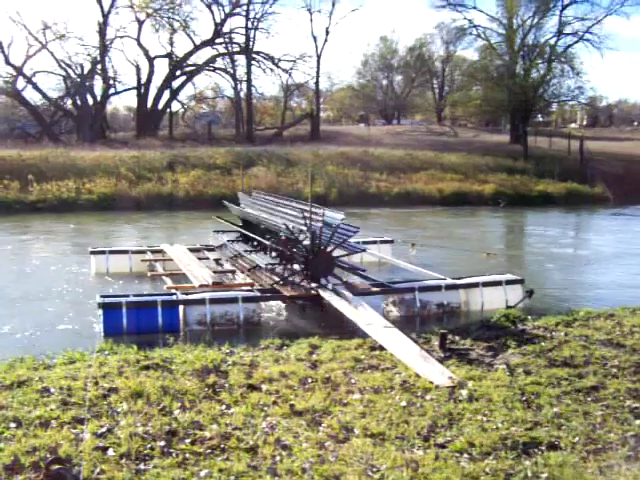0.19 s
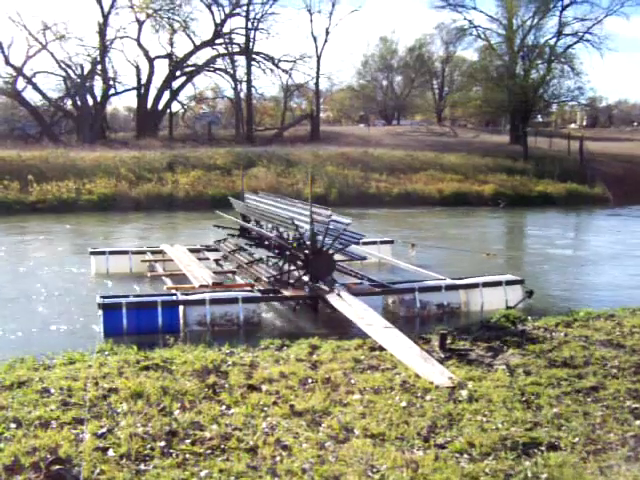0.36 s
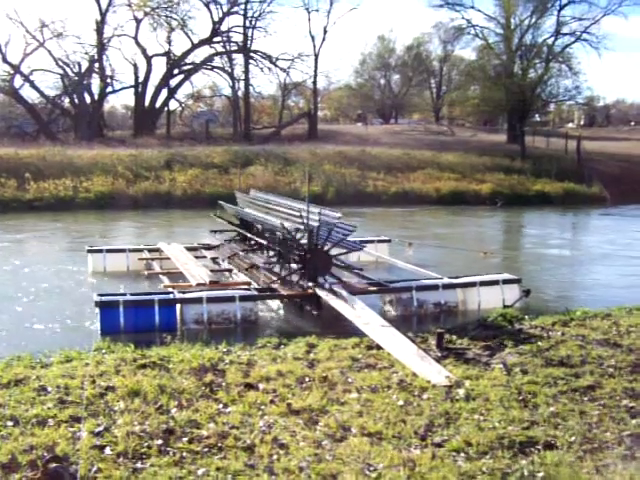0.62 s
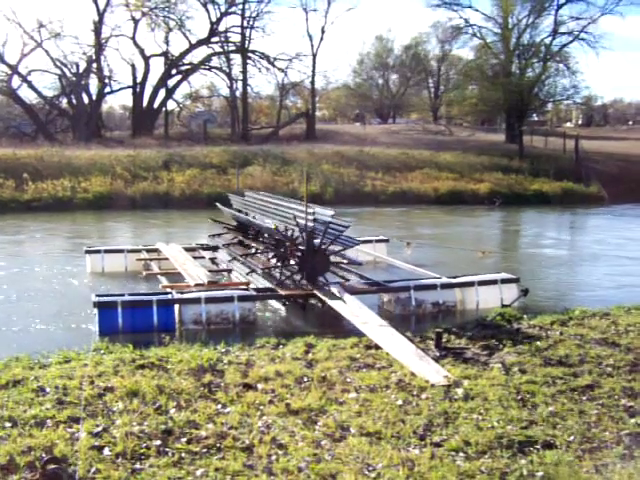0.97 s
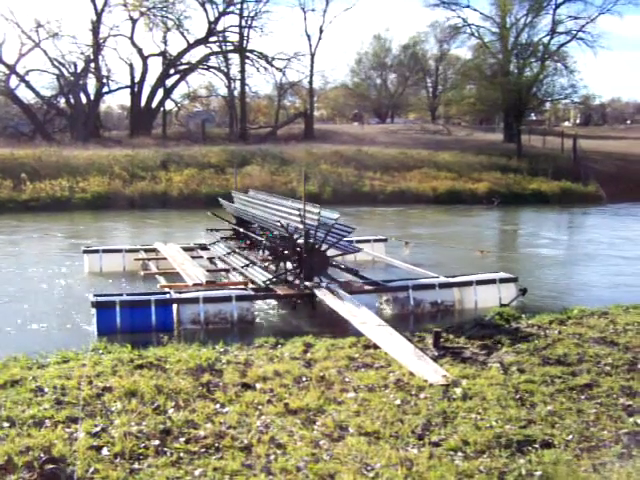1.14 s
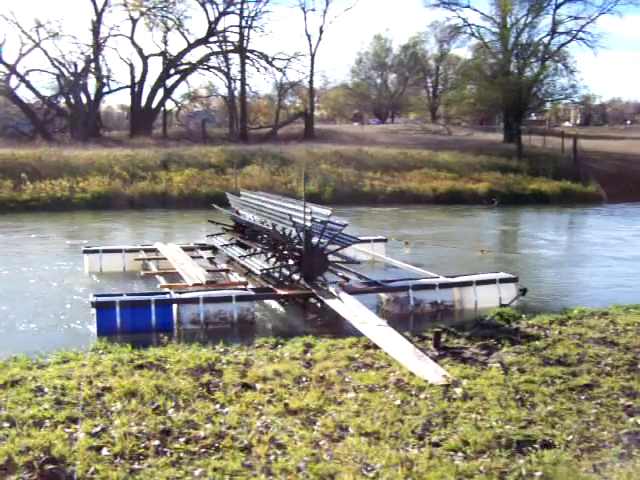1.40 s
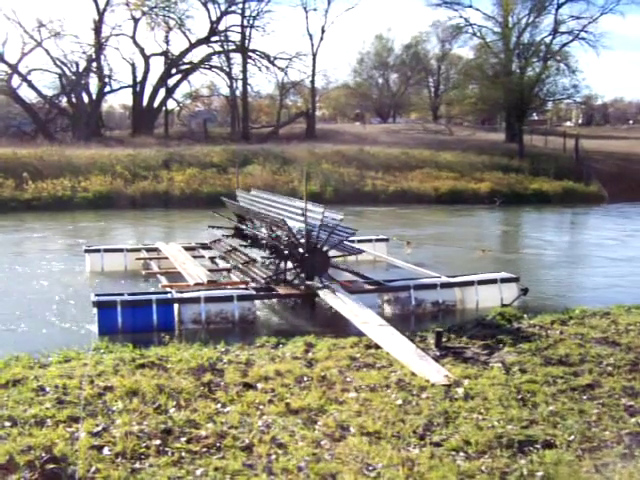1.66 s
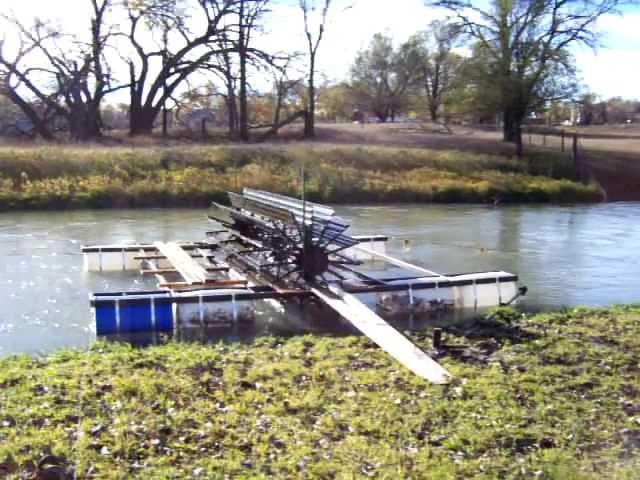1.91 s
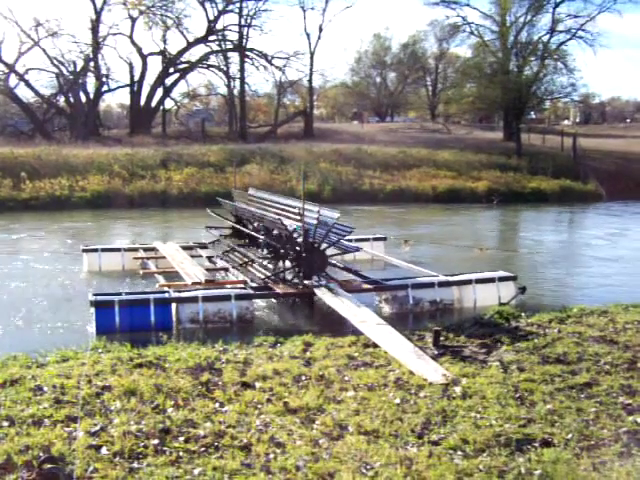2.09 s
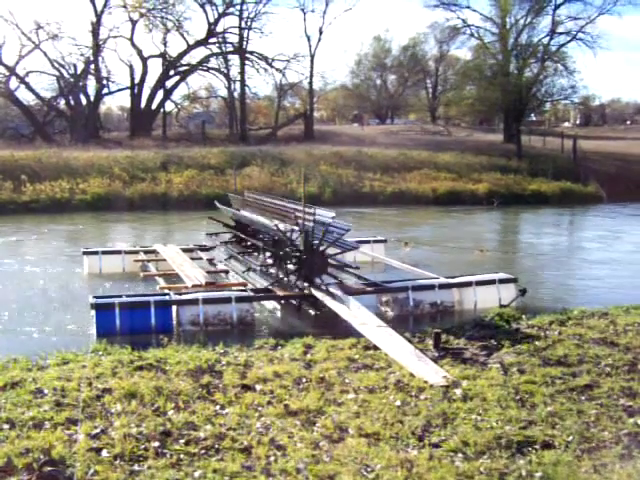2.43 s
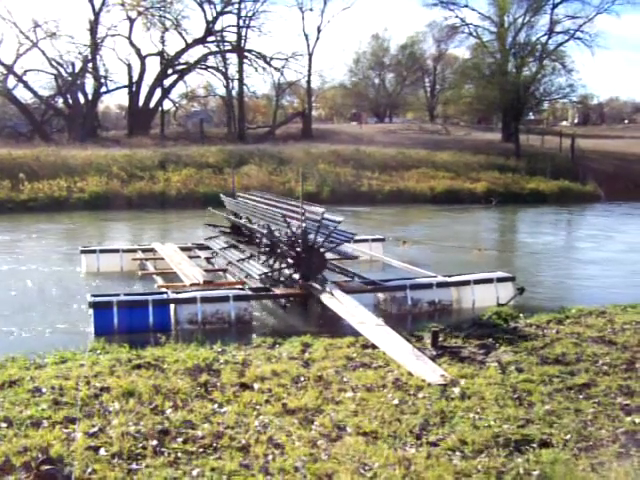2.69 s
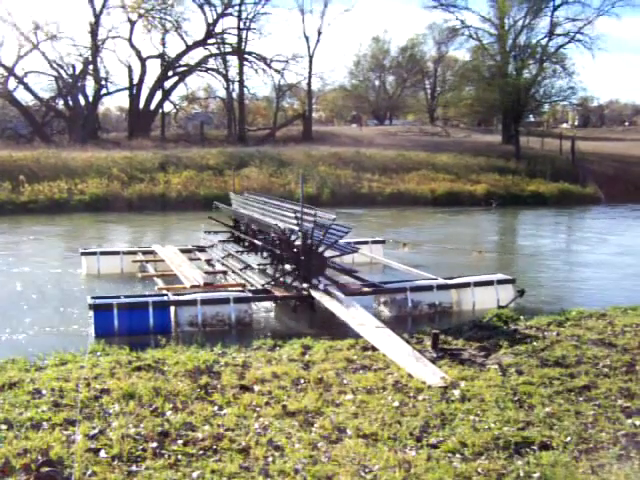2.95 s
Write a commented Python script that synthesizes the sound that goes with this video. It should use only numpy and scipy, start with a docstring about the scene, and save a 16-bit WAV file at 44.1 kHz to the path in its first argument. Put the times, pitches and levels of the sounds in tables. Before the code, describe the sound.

A paddle wheel splashes continuously in a river, its blades dipping with uneven sloshes, glugs and pattering drops. Behind it the current flows evenly, and soft gusts buffet the microphone on the open bank.

```python
"""Water churns and spray patters in surges at a floating paddle wheel, heard from the river bank.
The current rushes behind it; light wind rumbles on the microphone.
Paddles plunge with a hollow gulp and a slosh, among drips, glugs of freed air and a few slaps.
Churn, spray and plunges are clouds of ringing bubbles plus noise; drips and glugs ring single bubbles.
Current, wind and slaps are shaped noise."""
import sys
import numpy as np
from scipy.fft import rfft, irfft, next_fast_len
from scipy.io import wavfile
from scipy.ndimage import map_coordinates

SR = 44100
rng = np.random.default_rng(int(sys.argv[2]) if len(sys.argv) > 2 else 0)


def materialize(psi):
    """Save the field psi as 16-bit PCM at rate SR to the path in sys.argv[1].

    A 1-D psi becomes a single channel; in a 2-D psi each row is a channel.
    """
    bounded = np.clip(np.atleast_2d(psi).T, -1, 1)
    quanta = np.round(bounded * 32767).astype(np.int16)
    wavfile.write(sys.argv[1], SR, quanta)


N = 134946
T = np.arange(N) / SR

# splashing at the wheel (time [s], level [dB])
SPLASH_LEVELS = [(0.0, -27.5), (0.06, -30.5), (0.12, -29), (0.26, -27), (0.3, -27.5), (0.46, -27),
                 (0.5, -30.5), (0.56, -31), (0.7, -28.5), (0.78, -28), (0.84, -25.5), (0.94, -28.5),
                 (1.06, -29.5), (1.1, -30), (1.16, -27), (1.26, -27.5), (1.34, -30.5), (1.37, -28.5),
                 (1.4, -31.5), (1.46, -32), (1.64, -29.5), (1.7, -33.5), (1.77, -31), (1.83, -31.5),
                 (1.89, -32.5), (2.02, -30), (2.09, -26.5), (2.16, -29.5), (2.28, -27.5), (2.32, -33),
                 (2.36, -30.5), (2.46, -30.5), (2.58, -28), (2.66, -28.5), (2.72, -29), (2.78, -27.5),
                 (2.86, -31.5), (2.9, -27), (2.98, -32), (3.05, -29.5)]
# wind on the microphone (time [s], level [dB])
WIND_LEVELS = [(0.0, -45), (0.06, -38), (0.21, -39.5), (0.25, -32.5), (0.29, -30.5), (0.41, -47.5),
               (0.45, -34.5), (0.5, -38.5), (0.84, -36), (0.92, -40.5), (1.06, -40), (1.16, -41),
               (1.24, -38), (1.28, -40.5), (1.35, -36), (1.43, -33), (1.6, -40), (1.72, -32), (1.77, -35.5),
               (1.82, -30), (1.88, -36.5), (1.92, -30.5), (1.99, -33.5), (2.04, -32.5), (2.16, -42),
               (2.25, -33), (2.29, -40.5), (2.47, -33), (2.56, -47), (2.62, -38), (2.67, -40.5),
               (2.79, -29), (2.84, -36.5), (2.98, -27.5), (3.05, -36)]
# near drips (time [s], level [dB], pitch [Hz], t60 [s])
DRIP_EVENTS = [(0.1285, -11, 3720, 0.0044), (0.2704, -12.5, 3140, 0.0055), (0.3747, -20, 2470, 0.016),
               (0.4337, -16.5, 3230, 0.0088), (0.4338, -9.5, 3480, 0.005), (0.4575, -16.5, 4600, 0.0064),
               (0.534, -13, 4400, 0.005), (0.5815, -8, 3800, 0.0052), (0.941, -14, 2970, 0.0059),
               (1.0147, -15, 3300, 0.0055), (1.2168, -12, 3120, 0.0034), (1.3547, -12, 4300, 0.0018),
               (1.3597, -13.5, 3500, 0.0054), (2.0141, -15, 6020, 0.015), (2.2669, -24, 3760, 0.0043),
               (2.6383, -15, 3440, 0.0037), (2.9672, -18.5, 3520, 0.012), (3.0102, -14.5, 5330, 0.0026)]
# paddle plunges (time [s], gulp level [dB], slosh level [dB])
PLUNGE_EVENTS = [(0.144, -31, -27), (.305, -45, -41), (.44, -39, -36.5), (.625, -30.5, -44),
                 (.8, -35, -32.5), (1.09, -31, -31), (1.84, -33, -46), (2.005, -27, -40),
                 (2.28, -31, -35.5), (2.74, -33.5, -57), (2.91, -46, -33.5)]
# large air pockets breaking loose (time [s], level [dB], start pitch [Hz])
GLUG_EVENTS = [(.15, -21, 315), (0.162, -18.5, 475), (0.191, -17.5, 1455), (.21, -25.5, 529),
               (0.463, -19.5, 1320), (1.098, -24, 458), (1.555, -20, 951), (1.835, -24.5, 2050),
               (2.021, -24, 476)]
# water slapping the paddles (time [s], level [dB])
SLAP_EVENTS = [(.4348, -21), (.485, -23), (.5335, -18), (0.568, -16), (0.576, -20), (.643, -18),
               (1.3533, -12), (1.358, -23), (1.3595, -28), (1.3664, -23), (1.634, -23), (1.797, -30),
               (1.93, -15.5), (2.801, -16.5), (3.0095, -10.5)]

# source spectra (frequency [Hz], relative density [dB])
CHURN_SPECTRUM = [(100, -4), (200, 2.5), (320, -5), (400, -4.5), (490, -0.5), (600, -3.5), (710, -12),
                  (950, -0.5), (1400, -1), (1750, -2), (2500, 1), (4000, -4), (6000, 1), (10000, -55.5)]
SPRAY_SPECTRUM = [(700, -48), (1500, -16), (2700, -5.5), (3500, 1.5), (4400, -1), (5000, -4.5), (5700, -7),
                  (6500, -16.5), (7200, -17.5), (8000, -26.5), (8800, -27), (10000, -43.5)]
CURRENT_SPECTRUM = [(59, -23.5), (100, -13), (247, -5), (524, 1), (674, -7.5), (972, -1.5), (1630, -6.5),
                    (3670, -6), (5830, -18), (10000, -66), (13000, -75), (22000, -120)]
RUMBLE_SPECTRUM = [(15, -27), (25, -5), (40, -5), (65, 0.5), (115, -5.5), (190, -12), (300, -23.5),
                   (700, -67)]
BUFFET_SPECTRUM = [(30, -36), (65, -10.5), (110, 2), (180, -6), (260, -10.5), (600, -55.5)]
GULP_SPECTRUM = [(80, -26.5), (180, -5.5), (330, 6), (490, 5.5), (600, 5), (720, -21), (1500, -30)]
SLOSH_SPECTRUM = [(600, -29), (950, -5.5), (1450, -1), (2200, -1.5), (4000, -19.5), (8000, -41)]
SLAP_SPECTRUM = [(800, -29), (2200, -12), (3400, 7.5), (4500, 1.5), (5800, 0.5), (6800, -18.5), (8500, -21),
                 (10000, -45)]

IMPACT_RISE_S = 0.0003


def amp(db):
    """Decibels to gain."""
    return 10 ** (np.asarray(db) / 20)


def unit(x):
    """x at rms 1."""
    return x / np.sqrt(np.mean(x ** 2) + 1e-20)


def curve(rows):
    """One value per sample from (time [s], value) rows."""
    return np.interp(T, *np.transpose(rows))


def wobble(rate_hz):
    """Smooth random curve through Gaussian knots at rate_hz."""
    return map_coordinates(rng.standard_normal(2048), [T * rate_hz], mode="wrap")


def filtered(x, response):
    """Zero-phase filter with gain response(hz)."""
    size = next_fast_len(N + SR // 2)
    return irfft(rfft(x, size) * response(np.fft.rfftfreq(size, 1 / SR)), size)[:N]


def low_pass(x, cutoff_hz, order):
    """Butterworth magnitude, zero phase."""
    return filtered(x, lambda hz: 1 / np.sqrt(1 + (hz / cutoff_hz) ** (2 * order)))


def coloured(x, spectrum):
    """x shaped by a spectrum table, at rms 1."""
    knots_hz, db = np.transpose(spectrum)
    return unit(filtered(x, lambda hz: amp(np.interp(np.log(hz + 1), np.log(knots_hz), db))))


def noise(spectrum):
    """Shaped Gaussian noise at rms 1."""
    return coloured(rng.standard_normal(N), spectrum)


def swell(t, rise_s, t60_s):
    """Soft attack, exponential decay; silent before t = 0."""
    t = np.maximum(t, 0)
    return (1 - np.exp(-t / rise_s)) * np.exp(-np.log(1000) * t / t60_s)


def bubbles(spectrum, count, lo_hz, hi_hz, t60_cycles, glide, wash):
    """Cloud of short rising rings, many weak, few strong; wash is the noise share before shaping."""
    onset, pitch, rank, life = rng.random((count, 4)).T[:, :, None]
    hz = lo_hz * (hi_hz / lo_hz) ** pitch
    t60_s = t60_cycles * (.5 + life) / hz
    offsets = np.arange(min(int(t60_s.max() * SR), SR // 20))
    t = offsets / SR
    gain = np.maximum(rank, .02) ** -.3 * np.sqrt(hz / hi_hz)
    rings = gain * swell(t, .5 / hz, t60_s) * np.sin(2 * np.pi * hz * t * (1 + glide * t / t60_s))
    positions = (onset * N).astype(int) + offsets
    cloud = np.bincount(positions.ravel(), rings.ravel(), N)[:N]
    rush = low_pass(rng.standard_normal(N), hi_hz, order=1)
    return coloured(np.sqrt(1 - wash) * unit(cloud) + np.sqrt(wash) * unit(rush), spectrum)


def splashing():
    """One surging flow drives big churn bubbles, fine spray and a light patter of drops."""
    level_db = curve(SPLASH_LEVELS)
    surge_db = level_db - level_db.mean() + .5 * wobble(34.75)
    churn = bubbles(CHURN_SPECTRUM, 1500, lo_hz=278.8, hi_hz=3104, t60_cycles=87, glide=.057, wash=.62)
    spray = bubbles(SPRAY_SPECTRUM, 7000, lo_hz=1515, hi_hz=8520, t60_cycles=29, glide=.058, wash=.79)
    patter = bubbles(SPRAY_SPECTRUM, 350, lo_hz=1976, hi_hz=8230, t60_cycles=26, glide=.023, wash=.01)
    churn *= amp(-5 + .93 * surge_db + 1.35 * wobble(20))
    spray *= amp(-2 + 1.51 * surge_db + 1.45 * wobble(50.61))
    patter *= amp(-10.5 + .9 * surge_db)
    return amp(level_db.mean()) * (churn + spray + patter)


def current(level_db=-36.5):
    """Even rush of the river."""
    return amp(level_db + .36 * wobble(7.62)) * noise(CURRENT_SPECTRUM)


def wind():
    """Gusts rumble on the microphone; stronger ones add higher buffeting."""
    level_db = curve(WIND_LEVELS)
    gust_db = level_db - level_db.mean() + wobble(24.98)
    rumble = amp(.79 * gust_db) * noise(RUMBLE_SPECTRUM)
    buffet = amp(-8.5 + 2.3 * gust_db) * noise(BUFFET_SPECTRUM)
    return amp(level_db.mean()) * (rumble + buffet)


def drips(scatter_db=-10):
    """A near drop rings a tiny bubble and scatters a little spray."""
    out = np.zeros(N)
    fizz = noise(SPRAY_SPECTRUM)
    t = np.arange(SR // 25) / SR
    for start_s, db, hz, t60_s in DRIP_EVENTS:
        start = round(start_s * SR)
        span = slice(start, start + len(t))
        envelope = swell(t, IMPACT_RISE_S, t60_s)
        ring = np.sin(2 * np.pi * hz * t) * envelope / envelope.max()
        scatter = amp(scatter_db) * fizz[span] * swell(t, IMPACT_RISE_S, t60_s=.037)
        out[span] += amp(db) * (ring + scatter)
    return low_pass(out, cutoff_hz=5800, order=5)


def paddles(rise_s=.011, slosh_lag_s=.024):
    """Each paddle traps air with a low gulp, then throws a brighter slosh."""
    gulp = bubbles(GULP_SPECTRUM, 500, lo_hz=162.5, hi_hz=660, t60_cycles=15.8, glide=.21, wash=.49)
    slosh = bubbles(SLOSH_SPECTRUM, 2000, lo_hz=796, hi_hz=3340, t60_cycles=17, glide=.089, wash=.21)
    out = np.zeros(N)
    for start_s, gulp_db, slosh_db in PLUNGE_EVENTS:
        t = T - start_s
        out += amp(gulp_db) * gulp * swell(t, rise_s, t60_s=.34)
        out += amp(slosh_db) * slosh * swell(t - slosh_lag_s, rise_s, t60_s=.48)
    return out


def glugs(glide_per_s=1.3, waver=.06):
    """A large bubble wavers in shape and rises in pitch as it nears the surface."""
    out = np.zeros(N)
    for start_s, db, start_hz in GLUG_EVENTS:
        t = T - start_s
        pitch_hz = start_hz * (1 + glide_per_s * t + waver * wobble(250))
        ring = np.sin(2 * np.pi * np.cumsum(pitch_hz) / SR)
        out += amp(db) * swell(t, rise_s=.003, t60_s=.057) * ring
    return out


def slaps(spatter_db=-17):
    """A sheet of water smacks a paddle: dry crack, short spatter."""
    envelope = np.zeros(N)
    for start_s, db in SLAP_EVENTS:
        crack = swell(T - start_s, IMPACT_RISE_S, t60_s=.0051)
        spatter = amp(spatter_db) * swell(T - start_s, IMPACT_RISE_S, t60_s=.024)
        envelope += amp(db) * (crack + spatter)
    return envelope * noise(SLAP_SPECTRUM)


def scene():
    """Wheel, river and wind in open air; mono."""
    wheel = splashing() + paddles() + glugs() + drips() + slaps()
    return (wheel + current() + wind())[None]


def record(dry):
    """Steep treble cut."""
    return low_pass(dry[0], cutoff_hz=10200, order=60)[None]


dry = scene()
out = record(dry)
materialize(out)
```